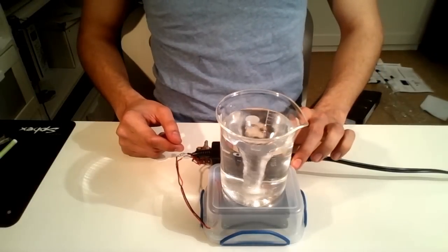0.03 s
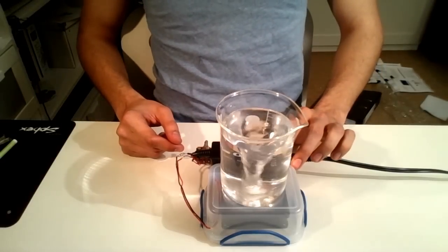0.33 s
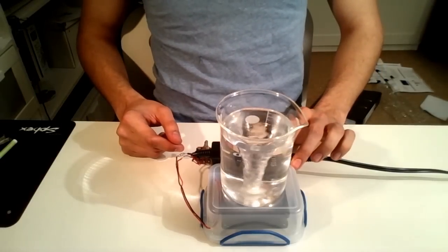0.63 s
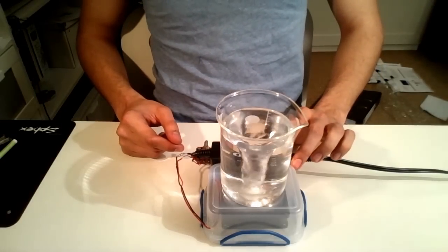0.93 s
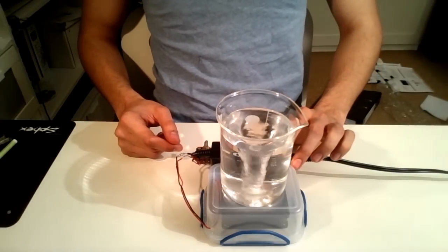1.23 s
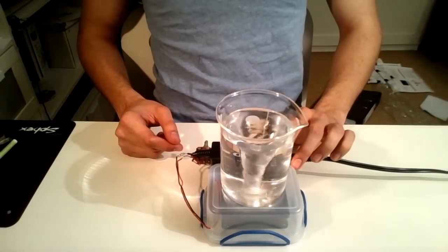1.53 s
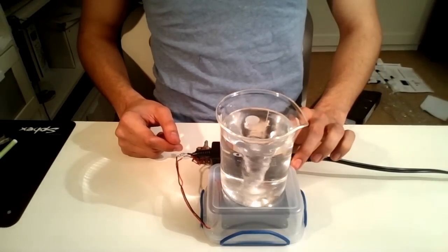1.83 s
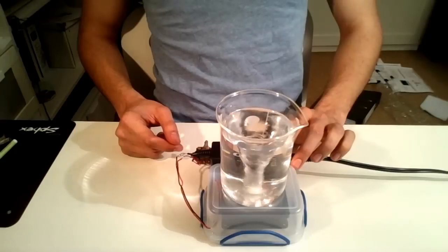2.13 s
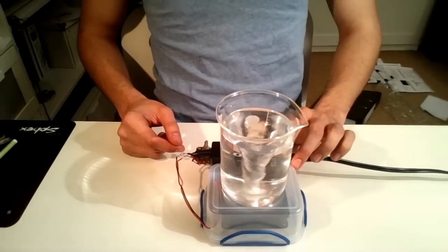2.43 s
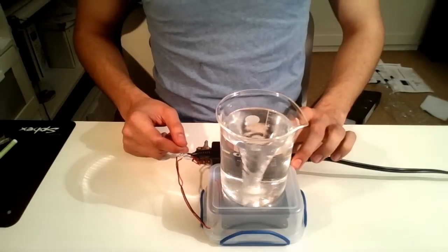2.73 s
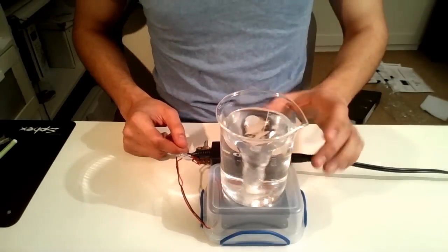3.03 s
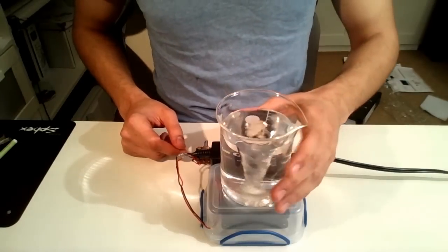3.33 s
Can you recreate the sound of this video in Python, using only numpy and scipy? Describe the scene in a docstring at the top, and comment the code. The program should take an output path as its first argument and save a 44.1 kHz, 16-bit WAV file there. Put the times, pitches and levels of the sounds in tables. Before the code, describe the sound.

A spinning stirring bar rattles against a glass beaker of water, its rapid clinks swelling and easing throughout. A small motor whirs and rumbles faintly underneath, close to the microphone in a small dry room.

```python
"""A small dry room, one microphone on a beaker of water that stands on a magnetic stirrer on a table.
The small motor rumbles and whirs in its plastic box. Over it the stirring bar, spinning off centre,
knocks on the glass twice a turn, about 27 times a second. Each knock chatters briefly, rings the
water-damped glass and adds a hard clack and a gritty tick."""
import sys
import numpy as np
from scipy import signal
from scipy.fft import rfft, irfft, next_fast_len
from scipy.io import wavfile
from scipy.ndimage import uniform_filter1d, map_coordinates

SR = 44100
rng = np.random.default_rng(int(sys.argv[2]) if len(sys.argv) > 2 else 0)


def put_to_file(sound):
    """Save the sound as 16-bit audio at rate SR, in the file named by the first command-line argument."""
    columns = np.atleast_2d(sound).T  # one column per channel
    safe = np.clip(columns, -1, 1)
    whole_steps = np.round(safe * 32767)
    wavfile.write(sys.argv[1], SR, whole_steps.astype(np.int16))


N = 158760
KNOCK_FFT = 8192  # samples that hold one knock


def amp(db):
    """Decibels to gain."""
    return 10 ** (np.asarray(db) / 20)


def unit(x):
    """Scale to rms 1."""
    return x / np.sqrt(np.mean(x ** 2) + 1e-20)


def band_gain(points, size):
    """Gain on an FFT grid from (Hz, dB) points on a log axis."""
    hz, db = np.transpose(points)
    return amp(np.interp(np.log(np.fft.rfftfreq(size, 1 / SR) + 1), np.log(hz), db))


def causal(points):
    """Spectrum of a minimum-phase filter through (Hz, dB) points."""
    cepstrum = irfft(np.log(band_gain(points, KNOCK_FFT)))
    cepstrum[1:KNOCK_FFT // 2] *= 2
    cepstrum[KNOCK_FFT // 2 + 1:] = 0
    return np.exp(rfft(cepstrum))


def noise(points):
    """Coloured noise of rms 1."""
    return unit(irfft(rfft(rng.standard_normal(N)) * band_gain(points, N), N))


# The motor box's three resonances. Each row: time in seconds, then boom, drone and honk in relative dB.
BOX_LEVELS = [(0.0, -67, -72, -65.5), (0.09, -82.5, -93, -80.5), (0.27, -65, -76.5, -69),
              (.5, -79, -86.5, -77.5), (0.539, -88, -67, -75), (0.95, -73.5, -77, -72.5),
              (1.52, -88, -89, -78.5), (1.65, -71.5, -77, -70.5), (1.78, -81, -70.5, -75.5),
              (2.14, -85, -80, -78.5), (2.25, -63.5, -72.5, -72), (2.3, -81.5, -87, -78.5),
              (2.49, -71.5, -66, -68.5), (2.69, -82.5, -81, -76.5), (2.97, -75.5, -63.5, -61.5),
              (3.05, -75, -75, -78), (3.169, -62.5, -60.5, -61), (3.29, -77.5, -84.5, -75.5),
              (3.4, -65, -63.5, -76), (3.52, -81, -96, -82), (3.6, -79, -86, -79)]
# Tone of those three and of the motor's whir. Each row: frequency in Hz, gain in dB.
BOOM_TONE = [(25, -45.5), (55, -35), (70, -22.5), (85, -8.5), (108, 7), (145, -4), (180, -11), (400, -49)]
DRONE_TONE = [(50, -55), (120, -33.5), (200, -12), (245, -26.5), (280, 10.5), (310, 8), (400, -20),
              (460, -5.5), (600, -26.5), (1500, -55.5)]
HONK_TONE = [(50, -63), (380, -31), (460, -5), (520, -14), (570, -1), (610, 4), (660, -5.5), (720, -3),
             (830, -7.5), (900, -17), (980, -9.5), (1400, -22.5), (3000, -46.5)]
WHIR_TONE = [(30, -39), (100, -15.5), (300, -21), (900, -25.5), (1300, 6.5), (1700, 12), (2100, 2),
             (3000, -6), (4000, -19), (6400, -23.5), (7000, -32.5)]
def motor(jolt_db=14, jolt_s=0.016):
    """The motor shakes its box, which every knock jolts as well, over a faint steady whir."""
    t = np.arange(N) / SR
    times, *levels = np.transpose(BOX_LEVELS)
    boom_db, drone_db, honk_db = [np.interp(t, times, db) for db in levels]
    starts = np.array(BAR_KNOCKS)[:, 0]
    since_knock = abs(t - starts[np.searchsorted(starts, t) - 1])
    swell = amp(jolt_db * np.exp(-since_knock / jolt_s))
    jolt = unit(uniform_filter1d(swell, size=180))
    drone = amp(drone_db + 3) * noise(DRONE_TONE)
    honk = amp(honk_db + 3) * noise(HONK_TONE)
    boom = amp(boom_db - 1) * noise(BOOM_TONE)
    whir = amp(-50.5) * noise(WHIR_TONE)
    return boom + jolt * (drone + honk) + whir


def contact(t, graze_s=0.0022, chatter_s=0.008, scrape_s=0.016, rebounds_per_s=700):
    """Force of the bar on the glass: a graze, the blow at t = 0, dying rebounds and a light scrape."""
    chatter = amp(-5.5) * np.exp(-abs(t) / np.where(t > 0, chatter_s, graze_s))
    scrape = amp(-11.5) * np.exp(-abs(t) / scrape_s)
    force = (chatter + scrape) * rng.standard_normal(len(t))
    force *= rng.random(len(t)) < rebounds_per_s / SR
    force[np.argmin(abs(t))] += 1  # the blow itself
    return force


def nearness(rows, centre_hz, width_hz):
    """1 for a row whose frequency is at the centre, falling to 0 away from it."""
    return np.exp(-.5 * ((np.array(rows)[:, 0] - centre_hz) / width_hz) ** 2)


def ringing(modes, favour_db, t, scatter_db=3.5, detune=0.0029, spread_s=0.0025, rise_s=0.0012):
    """Spectrum of damped modes, new at each blow; each starts late and swells as it rounds the glass."""
    hz, db, t60 = np.transpose(modes)
    level, tune = rng.standard_normal((2, len(hz)))
    late, phase = rng.random((2, len(hz), 1))
    age = np.maximum(t - spread_s * late, 0)
    envelope = (1 - np.exp(-age / rise_s)) * np.exp(-np.log(1000) * age / t60[:, None])
    waves = np.sin(2 * np.pi * (np.outer(hz * (1 + detune * tune), t) + phase))
    gains = amp(db + favour_db + scatter_db * level)
    return rfft(gains @ (envelope * waves), KNOCK_FFT)


# Low modes of the filled beaker. Each row: frequency in Hz, relative level in dB, T60 in seconds.
BEAKER_MODES = [(1208, -2.5, 0.06), (1280, -13.5, 0.048), (1456, -4, 0.063), (1554, -4, 0.08),
                (1609.3, -8.5, 0.09), (1679.2, -3, 0.072), (1766, -2, 0.082), (1825, -2.5, 0.032),
                (1908, -8, 0.15)]
# Lift or cut of the lowest mode. Each row: time in seconds, gain in dB.
LOWEST_MODE_GAIN = [(0, 3), (.65, -2), (1.15, 9), (1.4, -16), (3.6, -13)]
# What the glass radiates to the microphone. Each row: frequency in Hz, gain in dB.
RING_TONE = [(40, -87), (200, -48), (500, -38), (1000, -19.5), (1200, -6), (1450, 2.5), (1850, 2),
             (2050, -6), (3000, -46)]
def glass_ring(force, age, start_s, centre_hz):
    """The water-damped glass rings; the struck spot favours the modes near centre_hz."""
    favour_db = 21.5 * nearness(BEAKER_MODES, centre_hz, width_hz=78)
    favour_db[0] += np.interp(start_s, *np.transpose(LOWEST_MODE_GAIN))
    return irfft(force * ringing(BEAKER_MODES, favour_db, age) * causal(RING_TONE))


# High modes of the clack. Each row: frequency in Hz, relative level in dB, T60 in seconds.
HARD_MODES = [(1968, -4, 0.18), (2117, 7.5, 0.042), (2324, 2.5, 0.066), (2486, 2.5, 0.055),
              (2565, -0.5, .07), (2723, -2, 0.074), (2886, 1.5, 0.053), (2935, 0, .06), (3136, -8.5, 0.12),
              (3225, -6, 0.081), (3398, -10, 0.097)]
# Tone of the clack at the microphone. Each row: frequency in Hz, gain in dB.
CLACK_TONE = [(40, -84), (900, -46), (1600, -8.5), (2100, 1), (3300, 3), (3700, -0.5), (6000, -35.5)]
def hard_clack(force, age, centre_hz):
    """The same blow drives the high modes of the clack, favouring those near centre_hz."""
    favour_db = 11.5 * nearness(HARD_MODES, centre_hz, width_hz=81)
    return irfft(force * ringing(HARD_MODES, favour_db, age) * causal(CLACK_TONE))


# The highest, quickly damped modes. Each row: frequency in Hz, relative level in dB, T60 in seconds.
TOP_MODES = [(3673, 3, 0.045), (3910, 4, 0.023), (4123, -3.5, 0.078), (4540, -2.5, 0.0088),
             (4914, 6.5, 0.022), (5610, 1.5, 0.0072), (5365, -2, 0.049), (5942, 7, 0.012),
             (6500, -9.5, 0.017), (6870, -5, 0.035), (6426, 7, 0.017)]
# Where the tick is brightest. Each row: time in seconds, centre in Hz.
BRIGHT_CENTRE = [(.14, 5290), (.25, 6390), (.58, 4360), (.7, 6540), (1, 6470), (1.06, 4480), (1.14, 4480),
                 (1.2, 5350), (1.6, 5700), (1.75, 5280), (2.3, 5740), (2.7, 4960), (2.98, 6110),
                 (3.09, 4815), (3.4, 4410)]
# Tone of the contact itself. Each row: frequency in Hz, gain in dB.
TICK_TONE = [(40, -72), (200, -28.5), (1000, -9), (2500, -9), (3600, 3.5), (4500, 2.5), (5300, -4),
             (6400, 0), (7000, -19.5)]
def gritty_tick(t, age, start_s, swirl_db, rise_s=0.00055, fall_s=0.0033, tail_s=0.03, slips_per_s=3800):
    """A burst of tiny slips, heard partly directly and partly through the highest modes."""
    t = t - 0.0021  # the grit peaks just after the blow, as the bar presses home
    burst = np.exp(-abs(t) / np.where(t > 0, fall_s, rise_s))
    tail = amp(-10.5) * np.exp(-abs(t) / tail_s)
    modes = ringing(TOP_MODES, swirl_db, age)
    slips = rng.standard_normal(len(t)) * (rng.random(len(t)) < slips_per_s / SR)
    grit = rfft((burst + tail) * slips, KNOCK_FFT)
    rung_and_direct = modes / modes.std() + amp(4.5)
    hz = np.fft.rfftfreq(KNOCK_FFT, 1 / SR)[1:, None]
    centre_hz = np.interp(start_s, *np.transpose(BRIGHT_CENTRE))
    bright_db = 9 * nearness(hz, centre_hz, width_hz=410)
    brightness = causal(np.column_stack([hz, bright_db]))
    return irfft(grit * rung_and_direct * brightness * causal(TICK_TONE))


def water_swirl(starts, depth_db=6, shifts_per_s=12):
    """Swirling water slowly shifts the balance of the highest modes: one row of dB gains per knock."""
    knots = rng.standard_normal((len(TOP_MODES), 128))
    drifts = [map_coordinates(row, [starts * shifts_per_s], mode="mirror") for row in knots]
    return depth_db * np.transpose(drifts)


# The bar's knocks on the glass. Each row: start in seconds, ring level in dB, ring centre in Hz,
# clack level in dB, clack centre in Hz, tick level in dB. Levels are relative.
BAR_KNOCKS = [(0.03, -36.0, 1655, -44.5, 2920.0, -53), (0.061, -26.5, 1670, -32, 2880, -40.5),
              (0.106, -27, 1554, -34, 2680.0, -44.5), (0.137, -27, 1672, -40.5, 2720.0, -47),
              (0.179, -31, 1800, -47, 2660.0, -59.5), (0.213, -16.0, 1753, -33, 2080, -44.5),
              (0.252, -19, 1770, -33, 3460, -47), (0.286, -13, 1675, -24.5, 2550.0, -38.5),
              (0.328, -22.5, 1672, -34.5, 2390.0, -45), (0.36, -19.5, 1710, -31.5, 2390, -42),
              (0.397, -23.5, 1633, -36.5, 2370.0, -52), (0.419, -22, 1690, -34.5, 2560, -50.5),
              (0.435, -27, 1800, -37.5, 2090.0, -48), (0.471, -37, 1660, -49.5, 3190.0, -66),
              (0.527, -31, 1507, -45, 2100.0, -56.5), (0.545, -34.5, 1550, -44.5, 2870, -54.5),
              (0.584, -36.5, 1570, -44.5, 2900, -61), (0.62, -24.5, 1640, -32, 2780, -46),
              (0.663, -20, 1550, -30.5, 2330, -48), (0.694, -23, 1614, -36.0, 2900.0, -46.5),
              (0.73, -29, 1670, -40, 2900.0, -52.5), (0.769, -20, 1724, -31, 3090, -45.5),
              (0.81, -16.5, 1760, -33, 2970, -45.5), (0.836, -19.5, 1780, -32.5, 2340, -52),
              (0.88, -18.0, 1730, -33.5, 2360, -53.5), (0.915, -18.5, 1778, -30, 2500, -46.5),
              (0.952, -30, 1720, -42.5, 3360, -55), (0.989, -20.0, 1732, -33.5, 2550, -50),
              (1.028, -24.0, 1697, -37, 2540, -51.5), (1.062, -21.5, 1684, -34, 2900, -44.5),
              (1.106, -29.5, 1701, -35.5, 2800, -49), (1.131, -32, 1610, -31.5, 2890, -52),
              (1.176, -29, 1661, -37.5, 2890, -54.5), (1.213, -36, 1654, -43.5, 2450.0, -65.5),
              (1.249, -28.5, 1776, -39, 2890.0, -59), (1.283, -33.5, 1810, -44.5, 2900, -64),
              (1.323, -36.5, 1686, -48.5, 2160.0, -61.5), (1.36, -28, 1640, -44.5, 2450, -57.5),
              (1.4, -29.5, 1450, -27, 2180, -50.0), (1.432, -31.0, 1440, -30.5, 2120, -55.5),
              (1.476, -30.5, 1670, -36, 2910.0, -58.5), (1.508, -26.5, 1720, -36.5, 2950, -55),
              (1.546, -20, 1720, -34.5, 2960, -58), (1.58, -14, 1700, -31.5, 2010, -42),
              (1.618, -24, 1714, -35, 2090.0, -52), (1.653, -16.5, 1698, -31, 3270, -44.5),
              (1.694, -21.5, 1750, -35.5, 2520, -48.5), (1.73, -23.5, 1683, -30.5, 2900, -43.5),
              (1.768, -32.5, 1690, -40.5, 2980, -59), (1.802, -33, 1604, -34, 3000, -52.5),
              (1.84, -30.5, 1776, -32.5, 2360, -55.5), (1.873, -32, 1723, -39.5, 2920.0, -64.5),
              (1.92, -33.5, 1730, -46.5, 2900.0, -60), (1.951, -33.5, 1560, -33, 2040, -55.5),
              (1.99, -27, 1546, -35, 2930.0, -45), (2.025, -31, 1506, -32, 2130.0, -52.5),
              (2.062, -38.5, 1630, -46.5, 2120, -63), (2.095, -26.5, 1723, -44, 3210.0, -63.5),
              (2.136, -38, 1690, -47, 2150, -67), (2.173, -31, 1685, -42.5, 3380, -52),
              (2.211, -26.0, 1860, -39, 2200, -54), (2.239, -23.5, 1735, -38.0, 2140.0, -48),
              (2.328, -35.5, 1645, -46, 3250, -54.5), (2.357, -27.5, 1670, -36.5, 3370, -47),
              (2.396, -35.5, 1682, -39, 2490, -51), (2.433, -25.5, 1776, -30, 2560, -44),
              (2.478, -24.5, 1705, -28, 2530, -45.5), (2.505, -22.5, 1800, -33.0, 2560, -43.5),
              (2.547, -29, 1855, -42.5, 3230.0, -53), (2.578, -32.5, 1580, -37, 3240, -52.0),
              (2.618, -35.5, 1664, -46.5, 3240, -57), (2.652, -36, 1590, -45, 3150, -58),
              (2.692, -41, 1630, -56, 2960, -70), (2.724, -37, 1660, -48.5, 2930, -62),
              (2.773, -27.0, 1610, -43.5, 3190.0, -53.5), (2.8, -26.5, 1480, -34, 2440, -51.5),
              (2.84, -31.5, 1574, -39.5, 2490, -57), (2.876, -28, 1724, -34.5, 3360.0, -47.5),
              (2.919, -22.5, 1800, -28.0, 2120, -47.5), (2.948, -25, 1716, -31.5, 2090.0, -47.5),
              (2.99, -37, 1580, -43, 2150.0, -59), (3.021, -40, 1620, -51.5, 3100, -58),
              (3.059, -38, 1650, -54, 2850.0, -67), (3.095, -21, 1627, -36.5, 2790, -50),
              (3.132, -18.5, 1604, -34.5, 3030, -47), (3.153, -19.5, 1585, -37.0, 2170, -55),
              (3.172, -19.5, 1604, -30.5, 2990, -50), (3.208, -29, 1580, -42, 2980, -55),
              (3.245, -28, 1610, -33, 2220, -47.5), (3.287, -34, 1690, -36, 2160.0, -54),
              (3.318, -24.0, 1666, -37.5, 2920, -54.5), (3.359, -30.5, 1636, -35, 2880, -52.5),
              (3.392, -36.5, 1630, -41.5, 2890.0, -46.5), (3.435, -38.0, 1590, -48.5, 2910.0, -59.0),
              (3.467, -37, 1660, -40, 2850, -60.5), (3.504, -41, 1478, -54, 2160, -61.5),
              (3.552, -44.5, 1630, -56, 2910.0, -70.5), (3.582, -35, 1610, -36, 3020, -59.5)]
def stirring_bar(lead_s=0.012, blow_s=0.026, knock_s=0.11):
    """The off-centre bar strikes the beaker; every knock sounds a ring, a clack and a tick."""
    age = np.arange(int(knock_s * SR)) / SR
    t, lead = age - lead_s, int(lead_s * SR)
    blow = slice(lead, lead + int(blow_s * SR))  # each part's level holds over this stretch
    swirls = water_swirl(np.array(BAR_KNOCKS)[:, 0])
    out = np.zeros(N + SR)
    for (start_s, ring_db, ring_hz, clack_db, clack_hz, tick_db), swirl_db in zip(BAR_KNOCKS, swirls):
        force = rfft(contact(t), KNOCK_FFT)
        ring = glass_ring(force, age, start_s, ring_hz)
        clack = hard_clack(force, age, clack_hz)
        tick = gritty_tick(t, age, start_s, swirl_db)
        first = max(round(start_s * SR) - lead, 0)
        for wave, db in (ring, ring_db - 1), (clack, clack_db - 1.5), (tick, tick_db - 1):
            out[first:first + KNOCK_FFT] += amp(db) * wave / wave[blow].std()
    return out[:N]


def room(x, t60_s=0.048, rise_s=0.00093):
    """The table and nearby walls throw a short reflection back to the microphone."""
    t = np.arange(SR // 2) / SR
    envelope = np.exp(-np.log(1000) * t / t60_s) * (1 - np.exp(-t / rise_s))
    tail = rng.standard_normal(len(t)) * envelope
    return signal.fftconvolve(x, tail / np.linalg.norm(tail))[:N]


def scene():
    """At one microphone: the rattling bar up front, a little room behind it, the motor underneath."""
    bar = stirring_bar()
    return (bar + amp(-17.5) * room(bar) + motor())[None]


def record(dry, top_hz=7150):
    """The microphone keeps nothing above its band limit."""
    size = next_fast_len(N + SR // 2)
    passband = np.fft.rfftfreq(size, 1 / SR) < top_hz
    return irfft(rfft(dry, size) * passband, size)[:, :N]


dry = scene()
out = record(dry)
put_to_file(out)
```